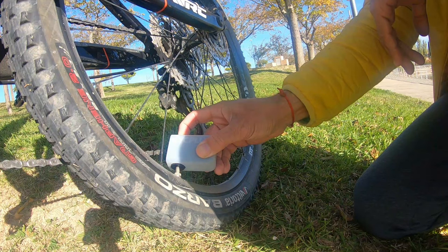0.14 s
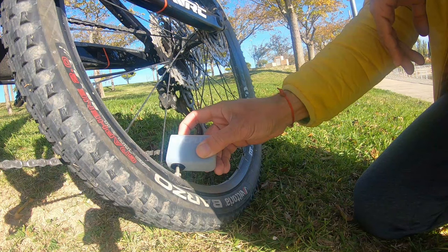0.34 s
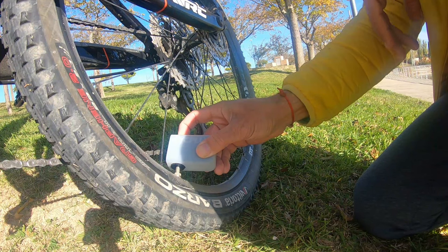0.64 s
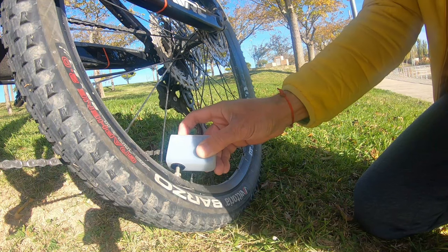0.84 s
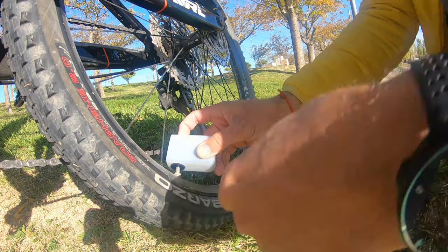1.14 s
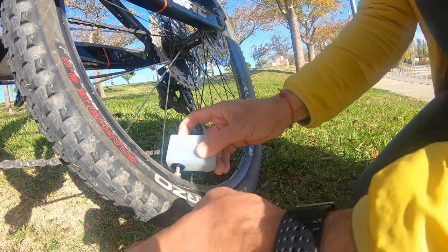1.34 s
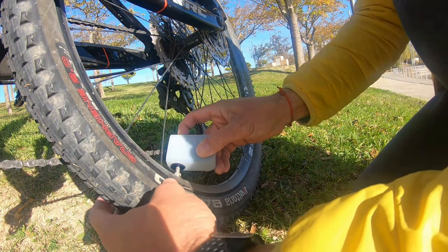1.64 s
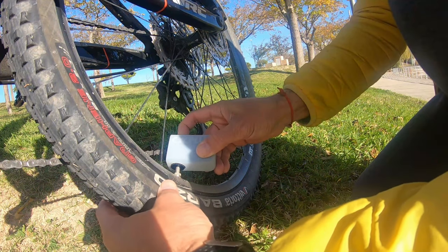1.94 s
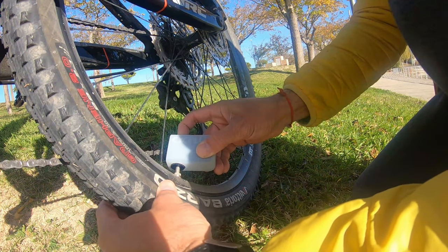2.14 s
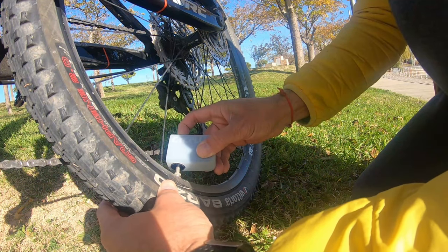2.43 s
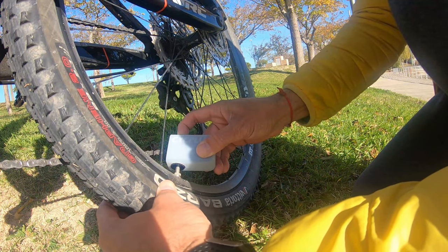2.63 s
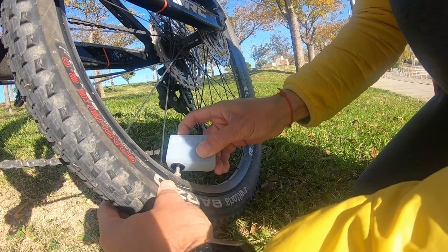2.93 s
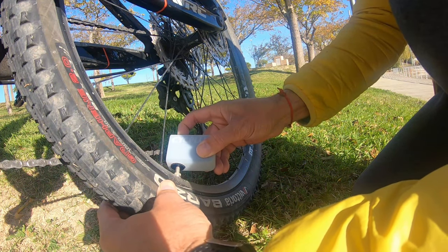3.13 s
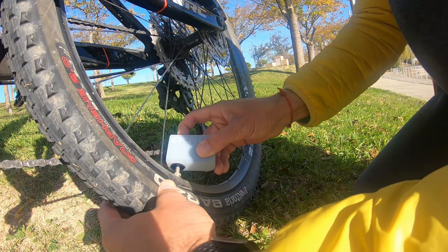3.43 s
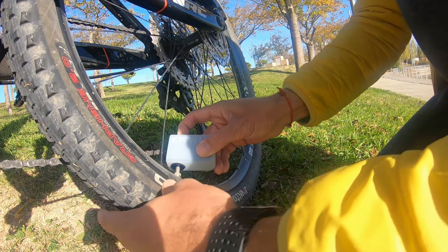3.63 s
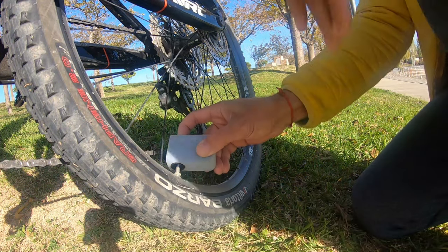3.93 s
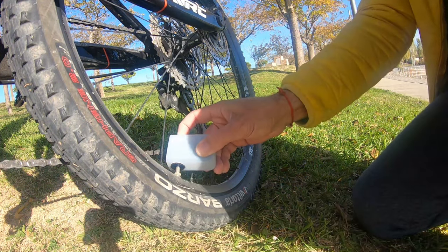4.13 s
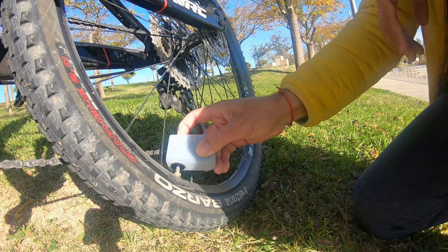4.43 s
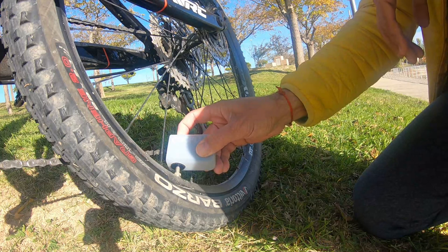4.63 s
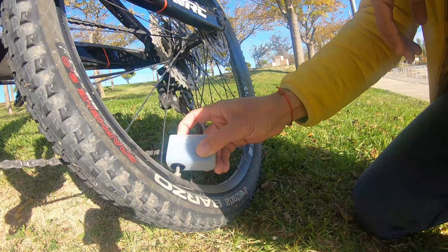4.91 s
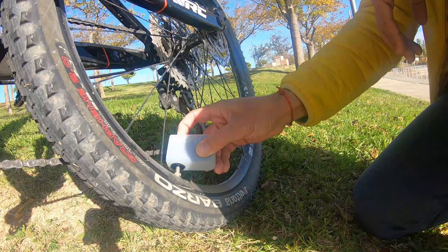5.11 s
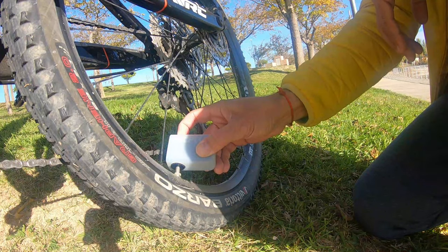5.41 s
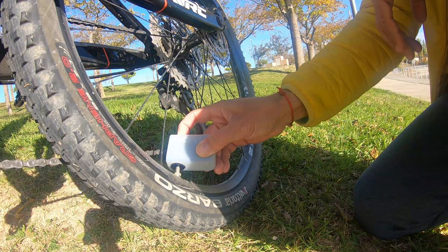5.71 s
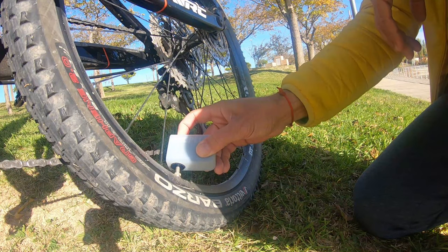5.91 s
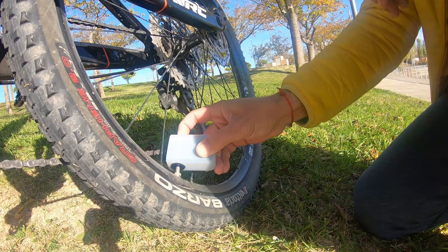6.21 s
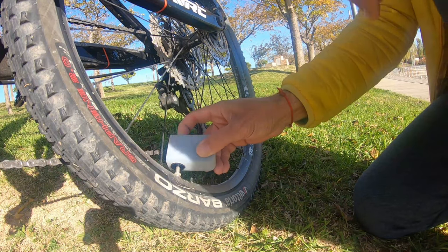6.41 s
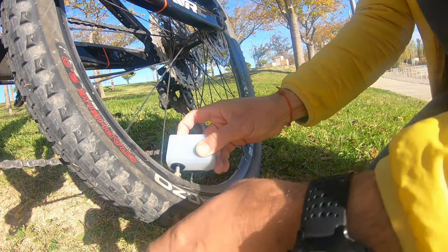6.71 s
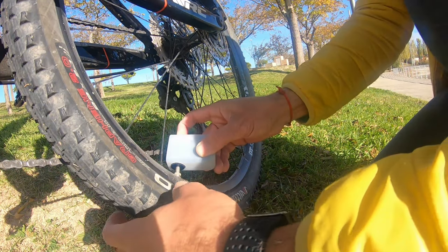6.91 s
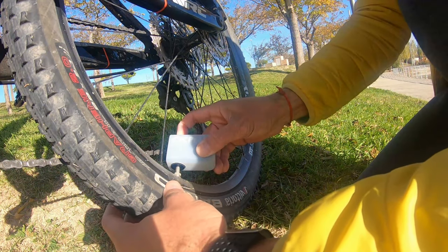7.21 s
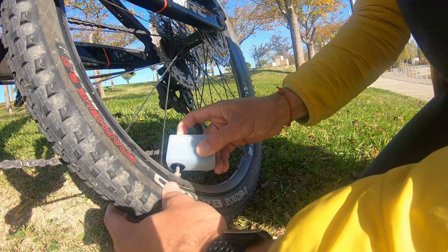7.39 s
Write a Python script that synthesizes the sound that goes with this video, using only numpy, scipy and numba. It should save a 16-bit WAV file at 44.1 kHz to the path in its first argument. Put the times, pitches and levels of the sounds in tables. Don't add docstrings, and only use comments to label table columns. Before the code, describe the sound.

Close, harsh drone of a little piston air pump rattling outdoors, sagging very slightly in pitch, while jacket fabric brushes and wind thumps softly.

```python
import sys
import numpy as np
from scipy import signal
from scipy.io import wavfile
from scipy.ndimage import uniform_filter1d
from numba import njit

SR = 44100
rng = np.random.default_rng(int(sys.argv[2]) if len(sys.argv) > 2 else 0)


def ratio_of_db(decibels):
    return 10 ** (np.asarray(decibels, float) / 20)


def master(y):
    cut = np.clip(np.atleast_2d(y).T, -1, 1)
    pcm = np.round(cut * 32767)
    wavfile.write(sys.argv[1], SR, pcm.astype(np.int16))


N = 332953
T_S = np.arange(N) / SR


def walk(rate_hz):
    hold = int(SR / rate_hz)
    steps = np.repeat(rng.standard_normal(N // hold + 1), hold)
    return 1.11 * uniform_filter1d(uniform_filter1d(steps, hold), hold)[:N]


def unit(x):
    return x / np.sqrt(np.mean(x ** 2))


def curve(table):
    time_s, level_db = np.transpose(table)
    return np.interp(T_S, time_s, level_db)


@njit
def svf_twice(x, g, k):
    y, b, l = x.copy(), np.zeros(2), np.zeros(2)
    for i in range(len(x)):
        for s in range(2):
            v = (b[s] + g[i] * (y[i] - l[s])) / (1 + g[i] * (g[i] + k))
            b[s], l[s], y[i] = 2 * v - b[s], l[s] + 2 * g[i] * v, k * v
    return y


def band(x, hz, width_hz, drift=0.):
    g = np.tan(np.pi * hz / SR) * (1 + drift) * np.ones(N)
    return np.array([svf_twice(row, g, width_hz / hz) for row in x])


def clicks(times_s, sizes):
    place = times_s[:, None] * SR
    index = np.floor(place).astype(int) + np.arange(-4, 6)
    taps = np.sinc(index - place) * np.cos(np.pi * (index - place) / 12) ** 2
    inside = (index >= 0) & (index < N)
    return np.bincount(index[inside], (taps * sizes[:, None])[inside], N)


def hiss(colour, likeness, flicker_db=0.5):
    out = 0
    for hz, width_hz, db, left_db in colour:
        right, own = unit(band(rng.standard_normal((2, N)), hz, width_hz))
        share = np.clip(likeness * 3000 / hz, 0, .95)
        left = share * right + np.sqrt(1 - share ** 2) * own
        out = out + ratio_of_db(db + flicker_db * walk(6)) * np.array([ratio_of_db(left_db) * left, right])
    return out


# (rate [Hz], slowing [Hz/s], depth [Hz], fastest at [s])
HUNT = [(2.624, .033, .35, 3.54), (4.26, 0, .23, 3.57)]


def crank():
    start_hz, sag_hz_per_s, ease_hz_per_s2 = 120.24, .46, .0187
    hz = start_hz - sag_hz_per_s * T_S + ease_hz_per_s2 * T_S ** 2
    for rate_hz, slowing, depth_hz, fastest_s in HUNT:
        age_s = T_S - fastest_s
        hz = hz + depth_hz * np.cos(2 * np.pi * age_s * (rate_hz - slowing * age_s / 2))
    start_turn = .26
    return start_turn + np.cumsum(hz * (1 + 0.000502 * walk(24.94))) / SR


# (multiple of crank rate [-], level [dB])
RAMP = [(1, 1.5), (2, -9), (3, -12), (4, -17), (5, -21), (6, -21)]


def pressure_ramp(turns):
    ramp_db, left_db, left_tilt_db = -25, -2.5, -0.22
    out = 0
    for k, db in RAMP:
        lead_rad = .27 * min(k - 1, 1) + .8 * np.clip(k - 3, 0, 2.1) ** 2
        level = ratio_of_db(ramp_db + db + 0.34 * k * walk(11))
        tone = -np.sqrt(2) * np.sin(2 * np.pi * k * turns + lead_rad) * level
        out = out + np.array([ratio_of_db(left_db + left_tilt_db * k) * tone, tone])
    return out


def rings(turns, modes, drift_ms, wander_db, detune=0.):
    jitter_ms, scatter_db, ring_drift = .004, .5, .007
    whole = np.arange(-1, int(turns[-1]) + 1)
    strikes = {angle: rng.standard_normal((len(whole), 2)).T for angle, *_ in modes}
    slide = {angle: walk(30) for angle in strikes}
    out, together = 0, walk(8.2)
    for row, (angle, hz, width_hz, db, left_db, lag_ms) in enumerate(modes):
        late, size = strikes[angle]
        times_s = np.interp(whole + angle, turns, T_S, -1, -1)
        slid = slide[angle][np.maximum(times_s * SR, 0).astype(int)]
        times_s = times_s + (jitter_ms * late + drift_ms * slid) / 1000
        pair = [clicks(times_s + lag_s, ratio_of_db(scatter_db * size)) for lag_s in (lag_ms / 1000, 0)]
        ring = (-1) ** row * unit(band(pair, hz, width_hz, detune + ring_drift * walk(7)))
        wander = wander_db * (0.27 * together + 0.3 * walk(11) + 0.89 * walk(28))
        out = out + ring * ratio_of_db(db + wander) * ratio_of_db(np.array([[left_db], [0]]))
    return unit(out)


SOFT_DRIFT_MS, HARD_DRIFT_MS = .005, .014

# (time [s], level [dB])
GRIP = [(0, 1), (.35, -0.5), (.85, 0), (1.2, .3), (1.75, -3), (1.95, 0), (3.4, 2.5), (3.7, -3), (4.1, 1),
        (4.65, -0.5), (4.9, 1.5), (5.5, 0), (5.75, 2), (6.3, 0.5), (6.45, -0.5), (6.7, -1.5), (6.9, -3),
        (7.55, -1.5)]


def held(start_db, growth_db_per_s, grip_share):
    return ratio_of_db(start_db + growth_db_per_s * T_S + grip_share * curve(GRIP))


def arm():
    return np.clip((T_S - 6) / .15, 0, 1)


INLET, FLICK, GULP, LATE = .475, .58, .455, .87
TURN, OPEN, FLOW, SNAP, SLAM, SEAT, RING, REBOUND = .357, .45, .668, .717, .78, .82, .829, 0.

# (crank angle [turns], centre [Hz], width [Hz], level [dB], left minus right [dB], left lag [ms])
CASING = [(TURN, 1275, 59, -5, -12.5, 0.53), (OPEN, 1584, 171, 0, -5.5, 0.063),
          (FLOW, 1616, 95, -9, -4.5, 0.0078), (SNAP, 1556, 341, -0.82, -5, 0.024),
          (FLOW, 1970, 247, -6, -4, 0.077)]
BODY = [(OPEN, 673, 95, -11, 0.78, -0.11), (OPEN, 968, 134, -5.5, -4.5, -0.093),
        (OPEN, 984.7, 239, 0, -4.5, -0.077)]


def casing(turns):
    walls = held(-32.5, 0.17, .1) * rings(turns, CASING, SOFT_DRIFT_MS, wander_db=1.56)
    return walls + ratio_of_db(-41.5 - arm()) * rings(turns, BODY, SOFT_DRIFT_MS, wander_db=0.7)


CLACK = [(INLET, 2468, 230, -7, -14, 0.016), (SEAT, 2396, 420, 0, -9.5, -0.01),
         (SEAT, 2960, 480, -0.96, -12.5, -0.019)]
FLAP = [(GULP, 2895, 440, 0, -20, .04), (FLICK, 4520, 1000, -9, -11, 0.08)]


def valves(turns):
    clack = held(-33.5, 0.11, 0.43) * rings(turns, CLACK, HARD_DRIFT_MS, wander_db=1.3)
    return clack + held(-43, 0.5, 0.33) * rings(turns, FLAP, SOFT_DRIFT_MS, wander_db=4.0)


HEAD = [(SEAT, 3218, 370, -1.9, -9, 0.021), (LATE, 3848, 440, 0, -6.5, 0.042)]


def head(turns):
    return held(-37, -0.18, 0.56) * rings(turns, HEAD, HARD_DRIFT_MS, wander_db=2.5)


CAP = [(LATE, 4160, 340, 0, -9, 0.18), (LATE, 4534, 345, -1.5, -6.5, 0.19)]
# (time [s], level [dB])
CAP_FREE = [(0, -1), (.5, -1), (1.0, -3), (1.3, -6), (1.5, 1.5), (1.7, 0), (3.5, -1), (3.8, 1), (4.2, -3),
            (4.35, -15), (4.7, -9), (4.85, -2), (5.7, 0), (6.55, -1.5), (6.65, 3), (6.76, -5), (6.9, 4.5),
            (7.55, 2.5)]


def cap(turns):
    free_db, rise_per_db = curve(CAP_FREE), .003
    ring = rings(turns, CAP, HARD_DRIFT_MS, wander_db=4.3, detune=rise_per_db * free_db)
    return ratio_of_db(-43 + free_db) * ring


TICK = [(RING, 4866, 300, -8.5, 3.2, 0.481), (SLAM, 5160, 860, 1.5, -15.5, 0.11),
        (SNAP, 5800, 280, -7, -20, 0.33), (SLAM, 6380, 680, -4.5, -22, 0.2),
        (REBOUND, 6000, 1100, -12, -5, 0.12), (SLAM, 7100, 180, -16, -12, 0.11)]
PING = [(SLAM, 8280, 1100, 0, -34, 0.11), (SLAM, 9060, 1100, -4.5, -35, 0.22),
        (SEAT, 9840, 800, -10.5, -28, 0.12), (SEAT, 10900, 1100, -11.5, -30, 0.3),
        (RING, 11000, 740, -19, -37, 0.057), (SEAT, 13300, 900, -20, -23, 0.11),
        (SLAM, 15000, 1500, -29, -15, 0.1)]


def ticks(turns):
    tick_db = -42.5 - 2.5 * arm() - 0.07 * T_S
    ping_db = -50.5 - 0.55 * T_S
    tick = ratio_of_db(tick_db) * rings(turns, TICK, HARD_DRIFT_MS, wander_db=2.5)
    return tick + ratio_of_db(ping_db) * rings(turns, PING, SOFT_DRIFT_MS, wander_db=3.5)


# (crank angle [turns], decay [turns], level over steady leak [dB])
SPIT = [
    (0.55, 0.07, 4.5),
    (.8, 0.076, 6.),
    (.93, 0.31, 5),
]
PUFF = [
    (0.55, 0.09, -7),
    (.84, 0.17, -1),
]
# (centre [Hz], width [Hz], level [dB], left minus right [dB])
LEAK = [(5450, 2000, -50.5, -12.5), (6600, 880, -59, -24), (8400, 3200, -52, -31),
        (11600, 2100, -68.5, -33), (12700, 1400, -71, -33)]
PUFF_COLOUR = [(1750, 1200, -47, -5), (2760, 1340, -42, -4), (4050, 760, -48, -5.5)]


def gate(turns, bursts):
    return unit(1 + sum(ratio_of_db(db) * np.exp(-((turns - angle) % 1) / decay) for angle, decay, db in bursts))


def leak(turns):
    low = gate(turns, PUFF) * hiss(PUFF_COLOUR, likeness=0.57, flicker_db=2.4)
    high = gate(turns, SPIT) * hiss(LEAK, likeness=1.0, flicker_db=1.5)
    return ratio_of_db(1.2 * walk(30)) * (low + high)


def pump():
    turns = crank()
    knocks = casing(turns) + valves(turns) + head(turns) + cap(turns) + ticks(turns)
    return pressure_ramp(turns) + knocks + leak(turns)


# (start [s], swell [s], hold [s], fade [s], rub [dB], sizzle [dB])
SWISH = [
    (0.772, 0.14, 0.11, .11, -46, -43),
    (3.898, 0.057, 0.036, 0.041, -45, -47),
    (6.255, 0.084, 0.2, .02, -44.5, -44),
]
# (centre [Hz], width [Hz], level [dB], left minus right [dB])
CLOTH = [(910, 1400, -1, -21), (2080, 1000, 5.5, -10), (3400, 1500, 4, -6)]
SIZZLE = [(4830, 2000, -2.5, -8), (6400, 2100, 0.5, -14), (8200, 2000, 3.5, -28), (10500, 2400, -9, -32),
          (13000, 2600, -18, -30)]


def sleeve():
    rise_db, gain = 14, 0
    for start_s, swell_s, hold_s, fade_s, *db in SWISH:
        full_s = start_s + swell_s
        before = np.maximum(full_s - T_S, 0) / swell_s
        after = np.maximum(T_S - full_s - hold_s, 0) / fade_s
        gain = gain + ratio_of_db(np.array(db)[:, None] - rise_db * np.maximum(before, after) ** 2)
    rub, sizzle = gain * ratio_of_db(0.73 * walk(25) + 1.3 * walk(200))
    dull = rub * hiss(CLOTH, likeness=0.85, flicker_db=2.0)
    return dull + sizzle * hiss(SIZZLE, likeness=0.72, flicker_db=0.8)


# (time [s], level [dB])
BREEZE = [(0, -50), (1.2, -49), (2.2, -46), (2.4, -40), (2.62, -35), (2.85, -48), (3.1, -46), (3.75, -43),
          (3.95, -40), (4.25, -42), (4.45, -44), (5.6, -46), (5.8, -40), (6.4, -41), (6.7, -44), (7.2, -44),
          (7.35, -49), (7.55, -50)]
# (time [s], peak [dB], length [ms])
GUSTS = [(1.271, -35, 4), (1.347, -33, 4), (2.044, -35, 3.5), (2.456, -28, 5.2), (2.484, -30, 4.2),
         (2.548, -25, 3.3), (2.6, -22, 8.7), (2.626, -23, 8.7), (2.655, -26, 6.5), (2.72, -29, 5.8),
         (2.991, -30, 5.2), (3.45, -25, 3.3), (3.483, -18, 4.2), (3.583, -28, 3.7), (3.899, -28, 4.2),
         (4.14, -12.5, 4.2), (4.184, -25, 4.2), (4.209, -21, 3.9), (4.552, -27, 4.2), (4.568, -26, 2.6),
         (4.684, -24, 3.3), (4.712, -26, 4.2), (5.024, -29, 4.4), (5.154, -27, 4), (5.432, -31, 3),
         (5.459, -23, 2.8), (5.841, -25, 4.2), (5.896, -14, 3.3), (5.927, -21, 2.6), (6.05, -21, 5),
         (6.112, -19, 4.2), (6.138, -30, 3.3), (6.272, -22, 4.2), (6.306, -28, 4.2), (6.388, -19, 4.2),
         (6.4, -20, 2.3), (6.411, -14, 1.9), (6.438, -20, 3.3), (6.585, -24, 2.6), (6.619, -21, 3.6),
         (6.63, -22, 3.7), (6.817, -28, 4), (6.861, -28, 4.8), (6.88, -24, 4.6), (6.959, -19, 2.3),
         (7.119, -19, 4.6), (7.185, -24, 4.2), (7.288, -26, 3.2)]


def wind():
    veer_s, lee_db, lee_slap_db, wake_db, wake_s = 3.3, -5, -34, -17.5, 0.023
    breeze = ratio_of_db(curve(BREEZE) + 1.5 * walk(6.1))
    wake = sum(ratio_of_db(db + wake_db) * np.exp(-((T_S - s) / wake_s) ** 2) for s, db, _ in GUSTS)
    level_db = 20 * np.log10(np.hypot(breeze, wake))
    lee = np.clip((T_S - veer_s) / .1, 0, 1)
    out = 0
    for low_hz, high_hz, depth, db in [(26, 68, 1.1, -8), (45.0, 110, 1.02, 0.5)]:
        edges = signal.butter(2, [low_hz, high_hz], "bandpass", fs=SR, output="sos")
        right, own = unit(signal.sosfilt(edges, rng.standard_normal((2, N))))
        left = (1 - 0.71 * lee) * right + (.15 + 0.66 * lee) * own
        left = left * ratio_of_db(lee * (lee_db + 1.7 * walk(8)))
        rumble_db = depth * (level_db + 36.5) - 35.0 + db + 3.6 * walk(18)
        out = out + np.array([left, right]) * ratio_of_db(rumble_db)
    ports = np.array([ratio_of_db(lee_slap_db * lee), np.ones(N)])
    for s, db, length_ms in GUSTS:
        age = (T_S - s) * 1000 / length_ms
        out = out - ratio_of_db(db) * np.sqrt(2 * np.e) * age * np.exp(-age ** 2) * ports
    return out


def park():
    return hiss([(192, 125, -56, -11), (483, 540, -56, -11), (975, 230, -61.5, -10)], likeness=0.33)


def scene():
    return pump() + sleeve() + wind() + park()


def roll_off(x):
    return signal.sosfilt(signal.butter(12, 15780, fs=SR, output="sos"), x)


def record(dry):
    return roll_off(dry)


dry = scene()
out = record(dry)
master(out)
```